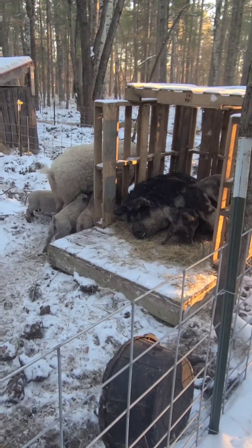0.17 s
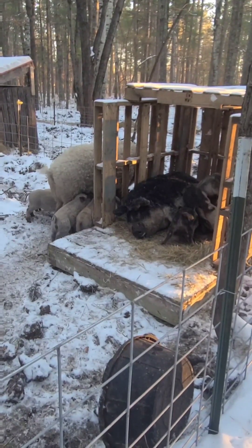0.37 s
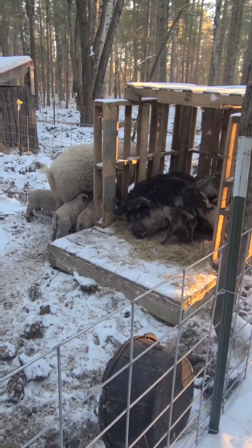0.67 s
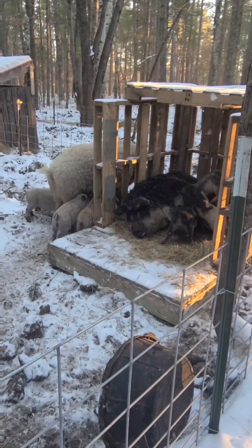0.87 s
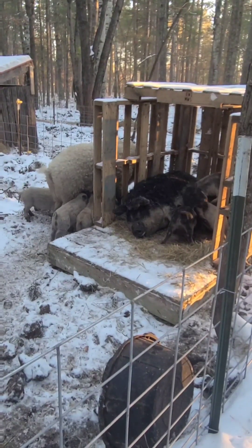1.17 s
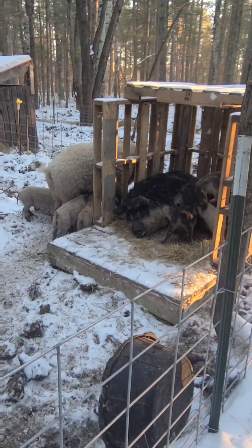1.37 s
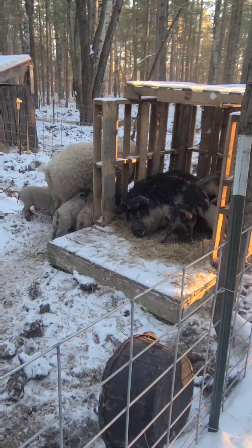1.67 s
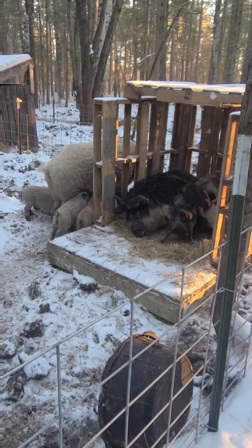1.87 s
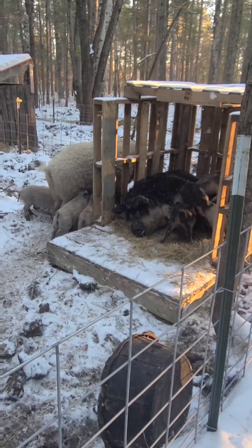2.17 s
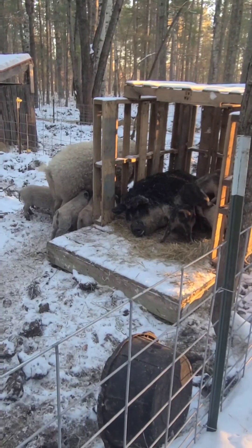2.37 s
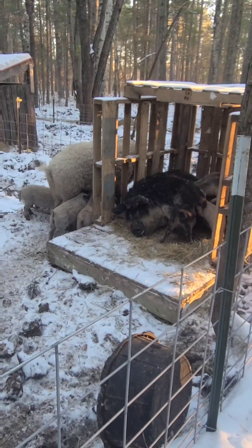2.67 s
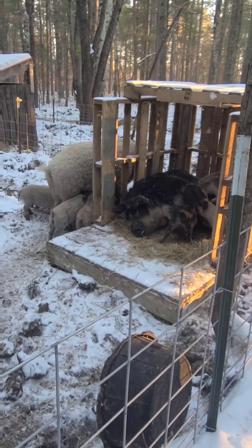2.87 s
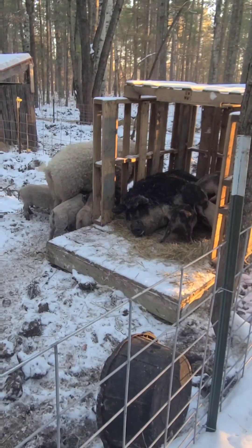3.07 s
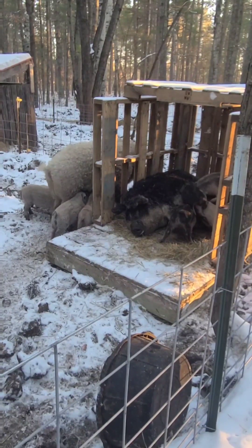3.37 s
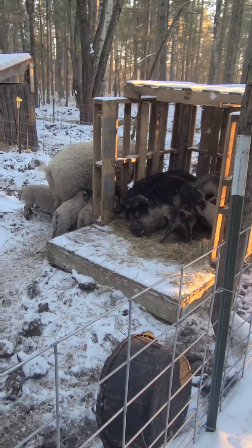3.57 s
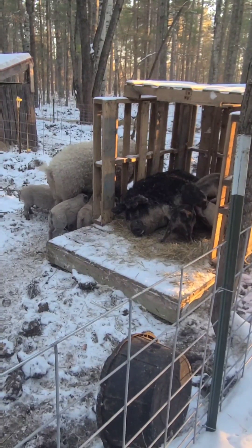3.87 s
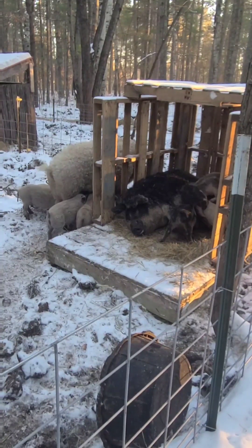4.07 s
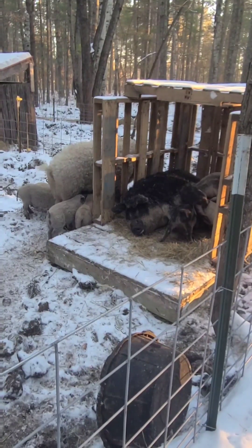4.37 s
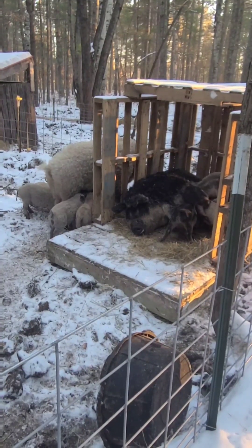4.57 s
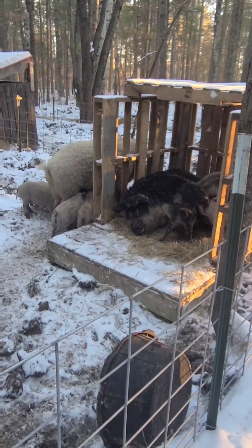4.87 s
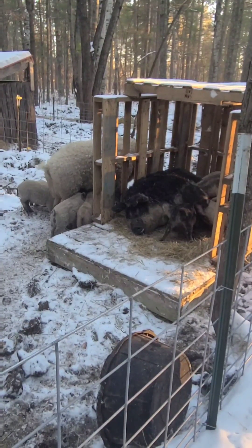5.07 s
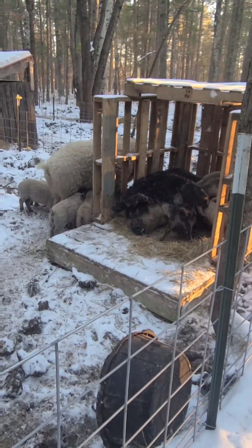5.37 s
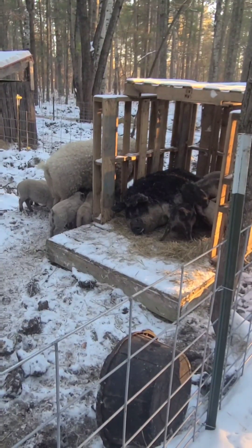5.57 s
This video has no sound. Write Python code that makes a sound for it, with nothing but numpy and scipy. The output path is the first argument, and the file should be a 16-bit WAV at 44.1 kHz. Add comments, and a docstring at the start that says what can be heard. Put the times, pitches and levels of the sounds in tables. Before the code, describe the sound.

A quiet snowy wood with faint, steady air hiss, heard in stereo from a few metres away. At 0 seconds bodies shift in bedding and a sow behind boards gives a low, muffled grunt; two small wet clicks or straw snaps come near 0.4. From 0.77 the nearer nursing sow grunts about every 0.6 seconds, at roughly 0.8, 1.5, 2.1, 2.7, 3.3, 3.9, 4.4, 5.0 and 5.6. Each lasts a little over a tenth of a second: four or five nasal, raspy throat snaps over a soft chest throb; the 2.7 grunt is weaker. Tiny squeaks ride on grunts near 0.8, 2.8 and 5.7. The muffled sow recurs irregularly, between or overlapping them. A brief piglet grunt comes at 1.5, then very faint falling ones near 2.9, 3.4, 3.8 and 4.5. Straw rustles and clicks around 2.3, and again rustles at 5.2, as the litter's stir gradually grows.

```python
"""A pallet shelter in snowy, quiet woods: pigs shift in the straw and a second sow grunts, muffled by boards.
Piglets' lips and snapping straw add small clicks; these are short bursts of noise.
Soon the near sow, nursing her piglets, grunts about every 0.6 s: a slow rattle of four or five throat snaps,
made of ringing pulses, over a soft chest throb at twice that rate. Thin squeaks ride on some of the snaps.
Among her grunts piglets grunt softly in short, falling tones, while the litter's stir grows."""
import sys
import numpy as np
from scipy import signal
from scipy.fft import rfft, irfft, next_fast_len
from scipy.io import wavfile
from scipy.ndimage import uniform_filter1d

SR = 44100
rng = np.random.default_rng(int(sys.argv[2]) if len(sys.argv) > 2 else 0)


def materialize(psi):
    """Save the field psi as 16-bit PCM at rate SR to the path in sys.argv[1].

    A 1-D psi becomes a single channel; in a 2-D psi each row is a channel.
    """
    bounded = np.clip(np.atleast_2d(psi).T, -1, 1)
    quanta = np.round(bounded * 32767).astype(np.int16)
    wavfile.write(sys.argv[1], SR, quanta)


N = 252252

# All dB values in the tables are relative levels; the functions may add trims.
# still winter air in the woods: [f/Hz, level per Hz/dB]
WOODS_COLOUR = [(15, -46.5), (25, -23.5), (93, 4.5), (176, -13), (344, -8), (488, -16), (769, -12.5),
                (1180, -13), (2020, -21.5), (4620, -23), (5570, -27.5), (7090, -26), (10000, -40.5),
                (11800, -34), (15000, -40.5)]
# left-right likeness of the surroundings: [f/Hz, likeness 0-1]
LIKENESS = [(50, 0.92), (700, 0.8), (1500, 0.26), (3000, 0), (12000, 0.16)]
# a body shifts in the bedding: [t/s, length/s, level/dB]
SHUFFLES = [(0, .19, -50), (.67, .25, -46.5), (.9, 0.15, -46.5), (1.38, 0.22, -51.5), (1.74, 0.07, -53),
            (1.89, 0.11, -48), (2.27, .19, -49), (2.82, 0.35, -51), (3.37, 0.072, -55), (3.59, 0.29, -53.5),
            (4.74, 0.073, -51)]
# the litter's constant stir, which grows as suckling gets going: [t/s, level/dB]
STIR = [(.5, -63.5), (1.4, -59), (5.72, -56)]
# rustles of dry straw: [t/s, length/s, level/dB]
STRAW = [(0.357, 0.16, -68.5), (.9, 0.24, -68), (2.249, 0.19, -60), (2.615, 0.056, -58.5),
         (5.229, 0.38, -64.5)]
# sound colours of shifting bodies and of straw: [f/Hz, level per Hz/dB]
SHUFFLE_COLOUR = [(100, 2), (200, -5), (380, -3.5), (500, -6), (700, -1), (1250, -8.5), (1500, -15),
                  (3000, -23.5), (8000, -41)]
STRAW_COLOUR = [(600, -22), (1200, -15.5), (2700, 2), (3800, -6.5), (6500, -7), (9000, -17.5), (15000, -22)]

# the far sow's grunts: [t/s, length/s, chest level/dB, throat level/dB]
FAR_GRUNTS = [(0.035, 0.16, -3, -33), (1.336, 0.11, -1.5, -25), (1.798, 0.15, -10, -29),
              (2.27, 0.21, -16.5, -27.5), (3.016, 0.15, -7, -24.5), (3.682, 0.16, -3, -23),
              (4.187, .12, -5, -25.5), (4.719, 0.11, -3.5, -28), (5.213, 0.11, -9, -30.5)]
# chest resonances of either sow: [f/Hz, width/Hz, level/dB]
CHEST = [(70.5, 29, -22), (128, 56.7, -27.5), (179, 65.3, -27.5)]
# resonances of the snout that stay put: [f/Hz, width/Hz, level/dB]
SNOUT = [(323, 69, -36), (417, 38.4, -35), (719, 78, -32.5), (835, 73, -26), (934, 118, -22),
         (3272, 127, -33), (4710, 110, -53.5)]
# hollows that the nose carves in the sound: [f/Hz, width/Hz, level/dB]
NOSE_HOLLOWS = [(261, 89, -37), (524, 234, -25), (1660, 140, -5.5), (2042, 1380, -20), (4000, 170, -30)]
# piglets' lips and snapping straw: [t/s, peak level/dB]
SMACKS = [(0.3571, -43), (0.386, -49), (2.2802, -46), (2.3725, -42)]

# the near sow's grunts: [t/s, snap gap at the peak/s, opening level/dB, ending level/dB,
# throat tuning ratio, lift of the throat and snout sound above 2 kHz/dB]
GRUNTS = [ (0.7683, .0293, -2.5, -10, 1.015, 0), (1.5233, .0268, -1.5, 2, 0.99, -6),
          (2.1032, .0227, -2, 2.5, 1.0, -0.5), (2.6920, .0305, -10, -11, 1.007, 1.5),
          (3.2968, .0312, -.5, -15, 1.016, 0), (3.9258, .0305, -4.5, -2, 0.997, 0.5),
          (4.4369, .0266, -1.5, 3, .98, -2), (5.0173, .0289, -2.5, -13, .99, -1.5),
          (5.5675, .0265, -7.5, 5.5, 0.99, -2)]
# throat shape as a grunt opens, swells, peaks and closes: [f/Hz, width/Hz, level/dB]
OPENING = [(1191, 81, -17.5), (1450, 150, -37), (1764, 84, -23), (2950, 97, -20.5)]
SWELLING = [(1096, 77.5, -10.5), (1210, 110, -32), (1355, 37.5, -30), (2810, 107, -24)]
PEAKING = [(1144, 67, -11), (1366, 180, -20), (1490, 150, -39), (2840, 330, -19.5)]
CLOSING = [(1190, 175, -12.5), (1308, 156, -19), (1500, 96, -34), (2960, 230, -26.5)]
# colour of the raspy breath at each snap: [f/Hz, level per Hz/dB]
RASP_COLOUR = [(500, -3), (1200, 10.5), (2100, -10.5), (3100, 3.5), (3900, -0.5), (4900, -12), (6500, -20),
               (9000, -38), (15000, -47)]
# thin squeaks on some throat snaps: [t/s, f/Hz, level/dB]
SQUEAKS = [(.799, 5100, -46), (.861, 5060, -45), (2.785, 4930, -43), (5.687, 4960, -42)]
# piglet grunts: [t/s, length/s, first f/Hz, last f/Hz, level/dB]
PIGLETS = [(1.516, 0.029, 793, 570, -27.5), (2.873, 0.043, 343, 336, -54.5), (3.389, 0.087, 313, 284, -59),
           (3.759, 0.11, 358, 284, -47.5), (4.513, 0.084, 326, 244, -38)]

# the hollow of the shelter rings on after each snap: [f/Hz, width/Hz, level/dB]
SHELTER = [(425.3, 18, 0.5), (1094, 19, -6.5), (1200, 31.5, -8), (1361, 34, -2)]
# the pigs at the two microphone ports: [f/Hz, left minus right level/dB]
PORT_BALANCE = [(70, -1.5), (140, -1), (240, -6.5), (330, -1.5), (412, -8.5), (560, 6.5), (800, 1),
                (1060, -0.5), (1200, -5), (1340, -5.5), (1530, -1.7), (2620, 4), (2880, -0.7), (3900, 6)]
# how far the left port leads the right: [f/Hz, phase/radians]
PORT_PHASE = [(320, 0), (420, .75), (670, 0), (1200, .05), (1480, 1.3), (1820, .9), (2870, 1.6),
              (3420, 2.1), (4900, 5), (12000, 9)]


def from_db(db):
    """Turn decibels into a plain multiplier."""
    return 10 ** (np.asarray(db) / 20)


def rms_one(x):
    """Scale a sound to an average (rms) strength of 1."""
    return x / np.sqrt(np.mean(x ** 2) + 1e-20)


def in_time(rows):
    """Read a table of [t/s, value] at every sample."""
    return np.interp(np.arange(N) / SR, *np.transpose(rows))


def at_hz(points, hz):
    """Read a table of [f/Hz, value] along log frequency."""
    points = np.array(points)
    return np.interp(np.log(np.maximum(hz, 1)), np.log(points[:, 0]), points[:, 1])


def add(track, s, sound):
    """Mix a sound into the track at time s."""
    i = int(np.clip(round(s * SR), 0, N))
    track[i:i + len(sound)] += sound[:N - i]


def swells(rows, shape=1):
    """Loudness curve of strokes that swell and fade; a smaller shape makes them fuller."""
    out = np.zeros(N)
    for s, length, db in rows:
        arch = np.abs(np.sin(np.linspace(0, np.pi, int(length * SR))))
        add(out, s, from_db(db) * arch ** shape)
    return out


def noise(colour):
    """Random hiss with the given colour, rms 1."""
    gain = from_db(at_hz(colour, np.fft.rfftfreq(N, 1 / SR)))
    return rms_one(irfft(rfft(rng.standard_normal(N)) * gain, N))


def wide_noise(colour):
    """Stereo hiss, alike on both sides in the bass and spread out in the treble."""
    hz = np.fft.rfftfreq(N, 1 / SR)
    alike = at_hz(LIKENESS, hz)
    mid, side = rfft(rng.standard_normal((2, N))) * from_db(at_hz(colour, hz))
    shared = np.sqrt(1 + alike) * mid
    opposed = np.sqrt(1 - alike) * side * [[1], [-1]]
    return rms_one(irfft(shared + opposed, N))


def resonate(x, hz, width):
    """Pass only the band around one resonance."""
    return signal.lfilter(*signal.iirpeak(hz, hz / width, fs=SR), x)


def ring(modes, rise_s, scale=1, edge_db=0, spread_db=0, glide=0, glide_s=0.0056):
    """One soft-edged pulse sets side-by-side resonances of alternating sign ringing.
    Those above 2 kHz are lifted by edge_db and slide upward by the share glide while they ring."""
    t = np.arange(SR // 7) / SR
    hz, width, db = np.array(sorted(modes), float).T[:, :, None]
    upper = hz > 2000
    db = db + edge_db * upper + spread_db * rng.standard_normal(hz.shape)
    sign = (-1) ** np.arange(len(hz))[:, None]
    slid_time = t + upper * glide * (t - glide_s * (1 - np.exp(-t / glide_s)))
    fade = np.exp(-np.pi * width * t)  # a wider resonance dies faster
    waves = sign * from_db(db) * fade * np.sin(2 * np.pi * hz * scale * slid_time)
    return waves.sum(axis=0) * (1 - np.exp(-t / rise_s)) ** 2


def still_woods(level_db=-57.5):
    """The quiet winter air is a steady, faint stereo hiss."""
    return from_db(level_db) * wide_noise(WOODS_COLOUR)


def bedding(flutter_db=3, grain_db=3.0):
    """Bodies rub in uneven strokes over a constant stir, and dry straw crackles under them."""
    slow_wander = uniform_filter1d(uniform_filter1d(rng.standard_normal(N), size=700), size=700)
    rub = from_db(flutter_db * rms_one(slow_wander))
    fast_wander = uniform_filter1d(rng.standard_normal(N), size=90)
    grains = from_db(grain_db * rms_one(fast_wander))
    movement = np.hypot(from_db(in_time(STIR)), swells(SHUFFLES, shape=0.41))
    shuffle = movement * rms_one(rub) * wide_noise(SHUFFLE_COLOUR)
    return shuffle + swells(STRAW) * rms_one(grains) * wide_noise(STRAW_COLOUR)


def throb(track, s, db, lead_s=0.0041, rise_s=0.0033):
    """The track with one more chest throb, which starts as the folds part just ahead of the snap."""
    out = track.copy()
    add(out, s - lead_s, -from_db(db) * ring(CHEST, rise_s))
    return out


def radiate(chest, low_hz=42):
    """The body is too small to send out the deepest part of its throb."""
    return signal.sosfilt(signal.butter(2, low_hz, "high", fs=SR, output="sos"), chest)


def nasal(x):
    """Side cavities of the nose carve hollows between the resonances."""
    for hz, width, db in NOSE_HOLLOWS:
        x = x + (from_db(db) - 1) * resonate(x, hz, width)
    return x


def far_sow(gap_s=.036, jitter_s=0.00138, rise_s=0.0015, muffle_db=-10, chest_trim_db=-3, swing_db=-2):
    """A similar rattle from behind the boards: mostly chest, little throat, blurred by echoes."""
    throat, chest = np.zeros((2, N))
    modes = [(1170, 46, -17.5)] + SNOUT
    for s, length, chest_db, throat_db in FAR_GRUNTS:
        for lag in np.arange(0, length, gap_s):
            arch = np.sin(np.pi * (lag + gap_s) / (length + 0.88 * gap_s))
            swell_db = 10 * np.log10(arch ** 2 + 1e-3)
            at = s + lag + rng.normal(0, jitter_s)
            push_db = chest_db + chest_trim_db + swell_db
            chest = throb(chest, at, push_db)
            chest = throb(chest, at + gap_s / 2, push_db + swing_db)  # again midway
            snap = ring(modes, rise_s, 1 + rng.normal(0, 0.031), muffle_db, spread_db=6.5)
            add(throat, at, from_db(throat_db + swell_db) * snap)
    # only one port's echoes are used here
    echoes = scatter(throat, db=-7.5, t60=0.089, dull_hz=1500, delay_s=0.005)[0]
    return radiate(chest) + nasal(throat) + echoes


def smacks(level_db=-4, length_s=0.0076):
    """Brief wet clicks, each a burst of noise that dies within milliseconds."""
    bursts = np.zeros(N)
    fade = np.exp(-np.arange(SR // 30) / SR / length_s)
    for s, db in SMACKS:
        add(bursts, s, from_db(db + level_db) * fade)
    return bursts * wide_noise([(500, -4), (1100, 7), (2800, -1), (4000, -39), (10000, -46)])


def near_sow(rise_s=0.00023, parting_s=0.00437, parting_db=-17, dying_db=-20, last_gap_s=0.025,
             swing_s=0.0148, rasp_db=-43, rasp_s=0.011, glide=.07):
    """Each grunt snaps the vocal folds shut a few times while the throat changes shape."""
    grunt_db, opening_gap_s, closing_gap_s = -1, .0297, .0313  # the same for every grunt
    throat, chest, airflow = np.zeros((3, N))
    t = np.arange(SR // 20) / SR
    puff = np.exp(-t / rasp_s) * (1 - np.exp(-t / rise_s)) ** 2
    postures = [OPENING, SWELLING, PEAKING, CLOSING, CLOSING]
    # snap by snap: [snout level/dB, chest throb level/dB, level of the soft swing after it/dB, share of glide]
    stages = [(0.0, -3.0, -33.5, 0.01), (2.0, 4, -19.5, 0.0), (4, 3.0, -1.0, 0.6),
              (-2.5, 3.0, -2.0, .6), (-5.5, -18.5, -23.5, 0)]
    for s, peak_gap_s, opening_db, ending_db, size, edge_db in GRUNTS:
        times = s + np.cumsum([0, opening_gap_s, peak_gap_s, closing_gap_s, last_gap_s])
        efforts = [opening_db, 0, 0, ending_db, ending_db + dying_db]
        for at, effort_db, posture, stage in zip(times, efforts, postures, stages):
            snout_db, chest_db, swing_db, slide = stage
            modes = posture + [(hz, width, level + snout_db) for hz, width, level in SNOUT]
            gain = from_db(grunt_db + effort_db)
            tuning = size * (1 + rng.normal(0, 0.011))
            snap = ring(modes, rise_s, tuning, edge_db, spread_db=1.4, glide=glide * slide)
            add(throat, at, gain * snap)
            # the folds part with a weaker, duller pulse before they snap shut
            parting = ring(posture[:1], 2 * rise_s, size)
            add(throat, at - parting_s, gain * from_db(parting_db) * parting)
            add(airflow, at, np.sqrt(gain) * puff)
            # the chest follows the effort less steeply
            push_db = grunt_db + 0.48 * effort_db
            chest = throb(chest, at, push_db + chest_db)
            # it throbs again midway, where the folds swing without closing
            chest = throb(chest, at + swing_s, push_db + swing_db, rise_s=0.0056)
    rasp = from_db(rasp_db) * airflow * noise(RASP_COLOUR)
    return nasal(throat) + radiate(chest) + rasp


def squeaks(width_hz=110, rise_s=0.00061):
    """Air forced through a narrowed nostril whistles for a few milliseconds."""
    out = np.zeros(N)
    for s, hz, db in SQUEAKS:
        add(out, s, ring([(hz, width_hz, db)], rise_s))
    return out


def piglets(overtone_db=-24, rough=0.47):
    """Short, soft, falling grunts with few overtones and a shaky level."""
    out = np.zeros(N)
    for s, length, first_hz, last_hz, db in PIGLETS:
        u = np.linspace(0, 1, int(length * SR))  # 0 to 1 through the grunt
        phase = 2 * np.pi * np.cumsum(first_hz + (last_hz - first_hz) * u) / SR
        voice = sum(from_db(overtone_db * k) * np.sin((k + 1) * phase) for k in range(3))
        add(out, s, from_db(db) * np.sin(np.pi * u ** 0.71) * voice)
    shake = noise([(60, -3.0), (150, -9.5), (600, -75.5)])
    return out * (1 + rough * shake)


def shelter(x):
    """The pulses with the lingering ring of the space between the boards."""
    return x + sum(from_db(db) * resonate(x, hz, width) for hz, width, db in SHELTER)


def scatter(x, db, t60, dull_hz, delay_s):
    """Diffuse echoes, different at each port, start late and fade 60 dB in t60 s; bass passes slats and trunks."""
    t = np.arange(SR // 2) / SR
    tail = rng.standard_normal((2, len(t))) * from_db(-60 * t / t60) * (t > delay_s)
    tail = tail / np.sqrt(np.sum(tail ** 2, axis=1, keepdims=True))
    dull = signal.sosfilt(signal.butter(1, [600, dull_hz], "band", fs=SR, output="sos"), x)
    return from_db(db) * signal.fftconvolve(dull[None], tail, axes=1)[:, :N]


def at_ports(x):
    """Sound from the shelter reaches the two ports with different level and phase."""
    size = next_fast_len(N + SR // 10)
    hz = np.fft.rfftfreq(size, 1 / SR)
    # each port takes half of the difference
    half = from_db(at_hz(PORT_BALANCE, hz) / 2) * np.exp(.5j * at_hz(PORT_PHASE, hz))
    return irfft(rfft(x, size) * np.array([half, 1 / half]), size)[:, :N]


def scene():
    """The pigs, echoes from the boards, a faint return from the trees and the still winter air."""
    sows = shelter(from_db(-0.5) * near_sow() + far_sow())
    pigs = sows + squeaks() + piglets()
    boards = scatter(pigs, db=-16, t60=.09, dull_hz=6000, delay_s=.003)
    trees = scatter(pigs, db=-33.5, t60=0.59, dull_hz=2500, delay_s=0.037)
    return at_ports(pigs) + boards + trees + bedding() + smacks() + still_woods()


def record(dry, low_hz=22, cutoff_hz=15200):
    """The microphone sheds the deepest rumble, and the top is cut steeply."""
    thinned = signal.sosfilt(signal.butter(1, low_hz, "high", fs=SR, output="sos"), dry)
    return signal.sosfilt(signal.ellip(12, .1, 80, cutoff_hz, fs=SR, output="sos"), thinned)


dry = scene()
out = record(dry)
materialize(out)
```